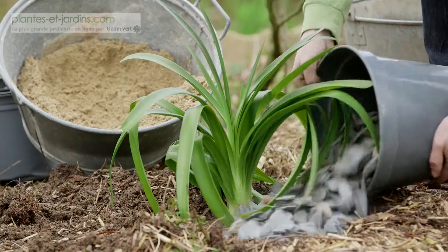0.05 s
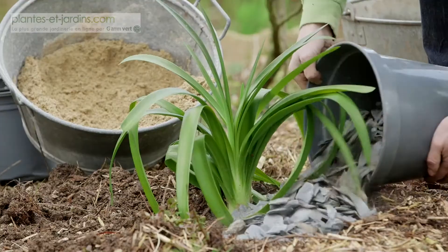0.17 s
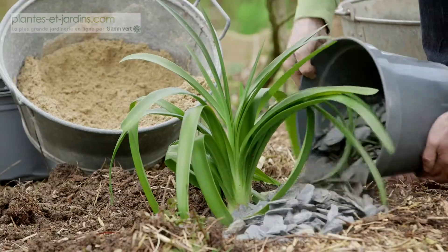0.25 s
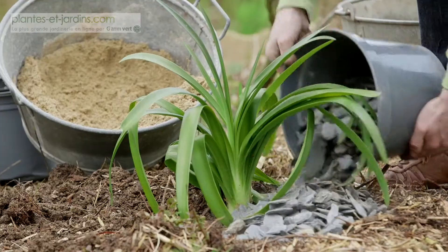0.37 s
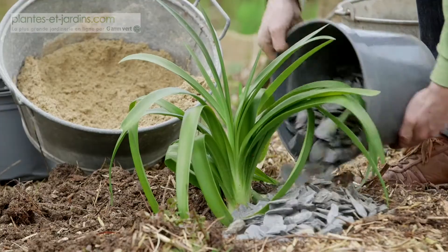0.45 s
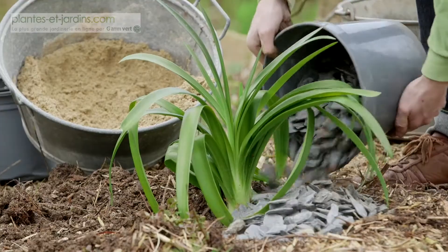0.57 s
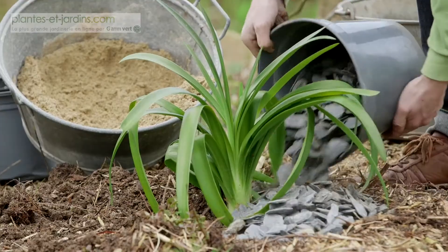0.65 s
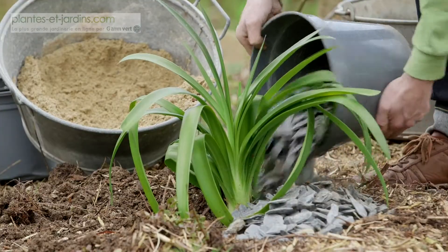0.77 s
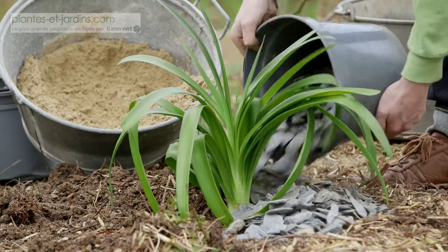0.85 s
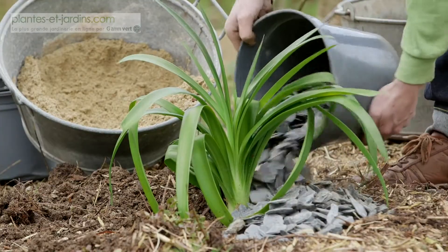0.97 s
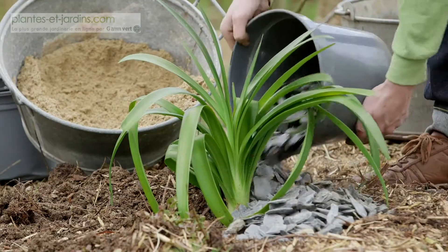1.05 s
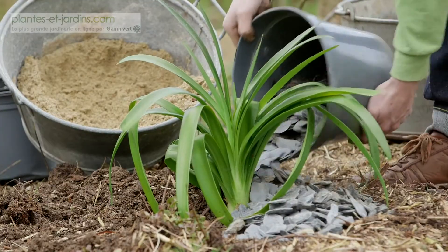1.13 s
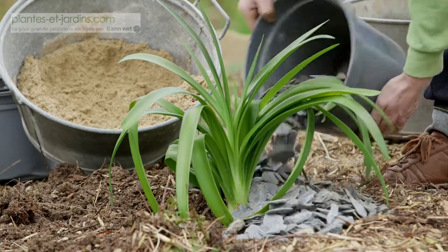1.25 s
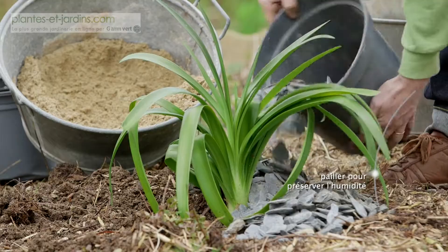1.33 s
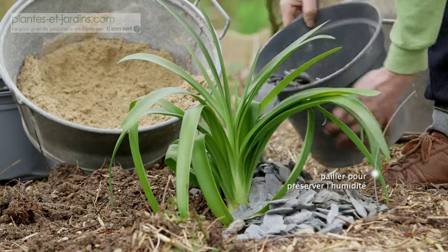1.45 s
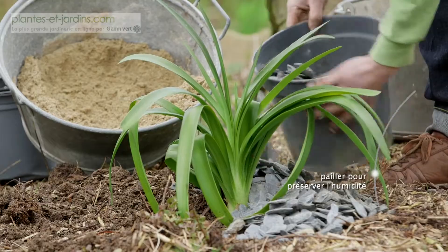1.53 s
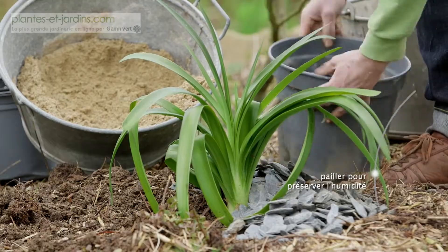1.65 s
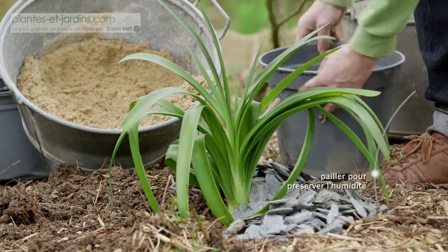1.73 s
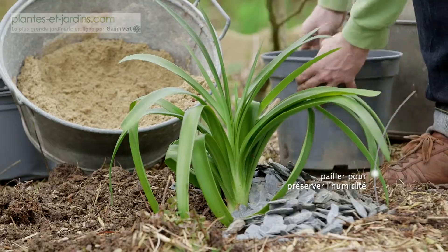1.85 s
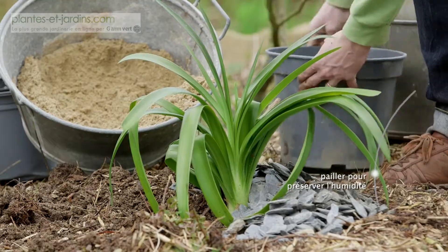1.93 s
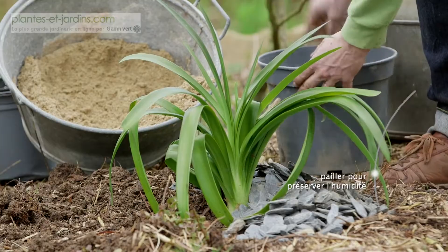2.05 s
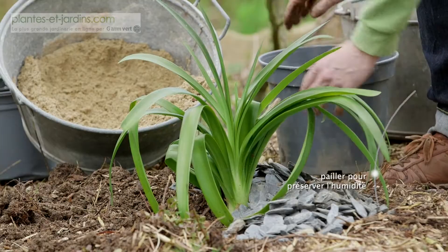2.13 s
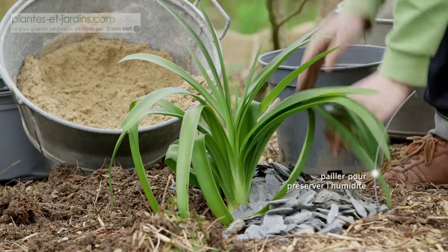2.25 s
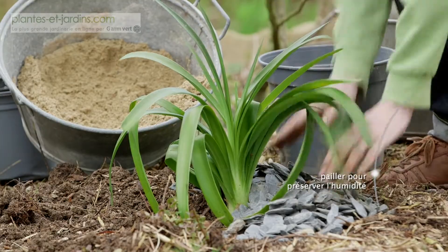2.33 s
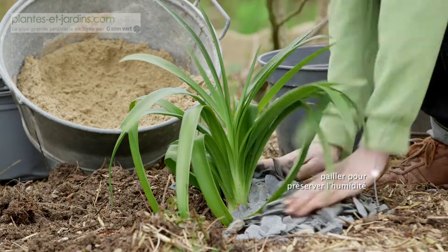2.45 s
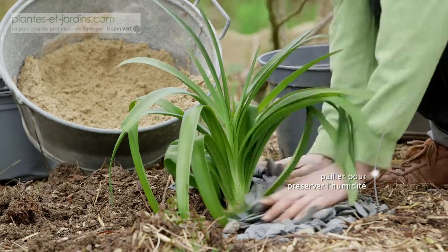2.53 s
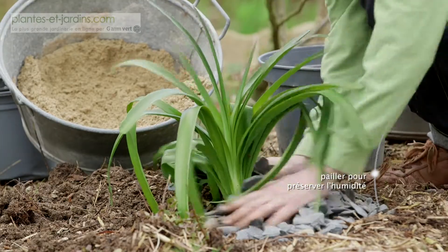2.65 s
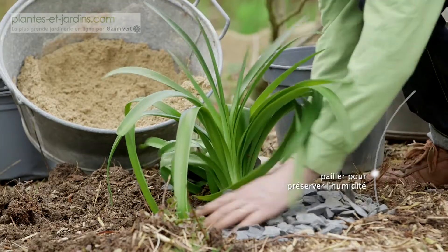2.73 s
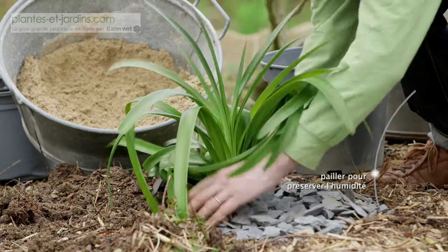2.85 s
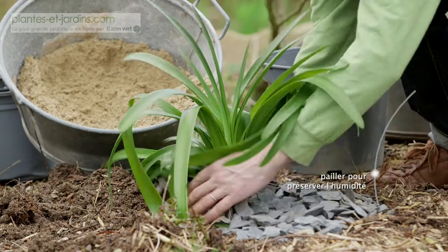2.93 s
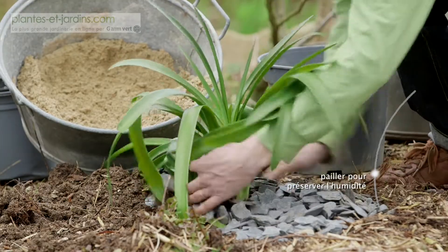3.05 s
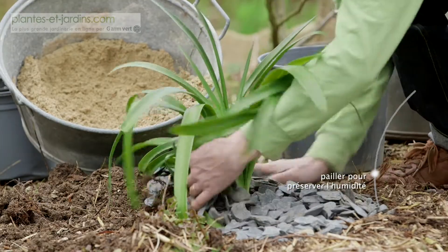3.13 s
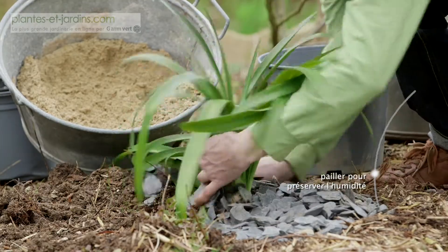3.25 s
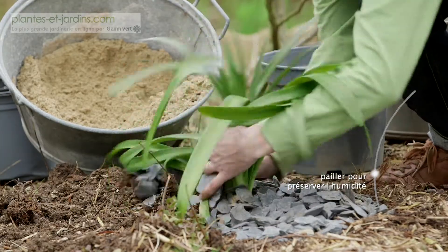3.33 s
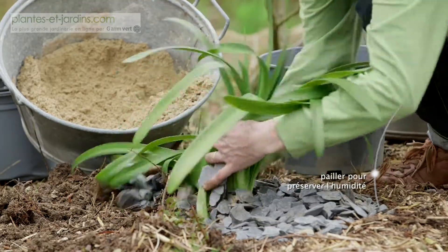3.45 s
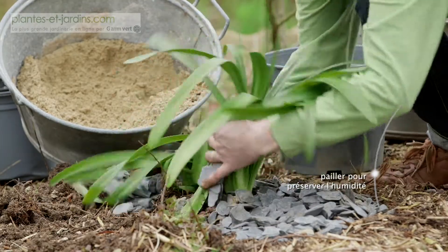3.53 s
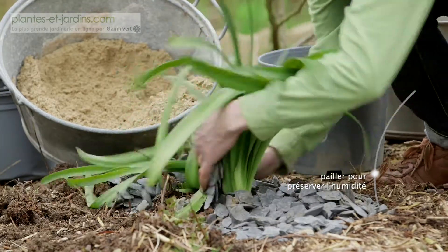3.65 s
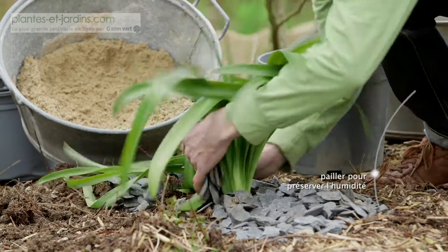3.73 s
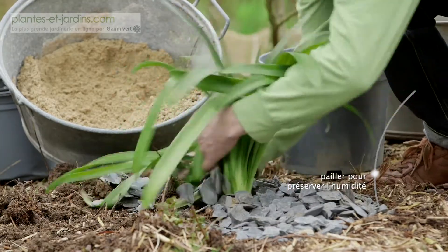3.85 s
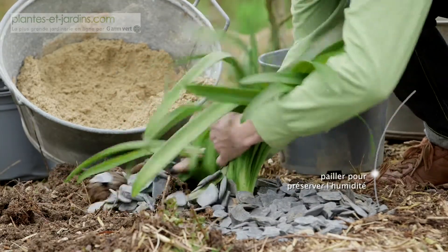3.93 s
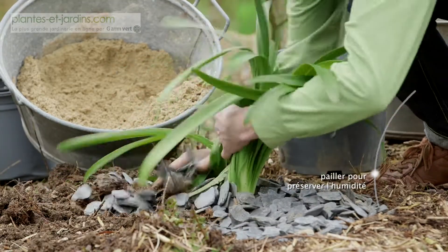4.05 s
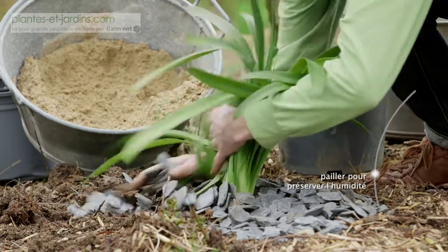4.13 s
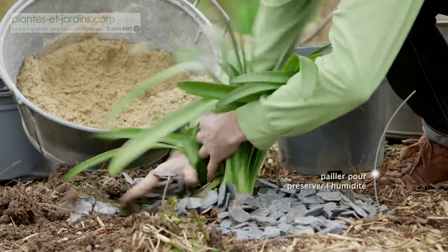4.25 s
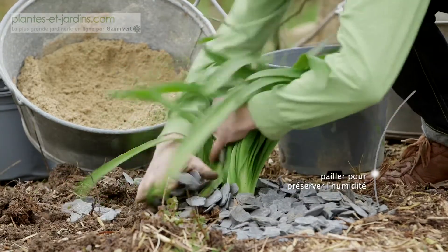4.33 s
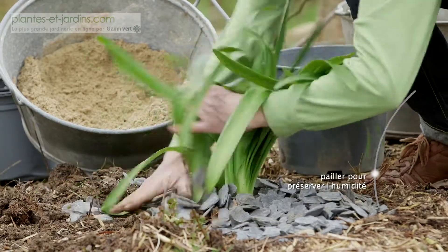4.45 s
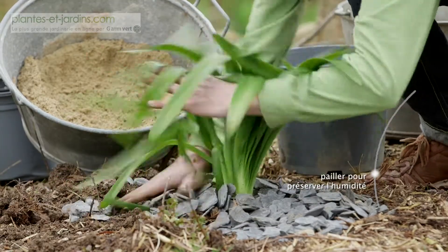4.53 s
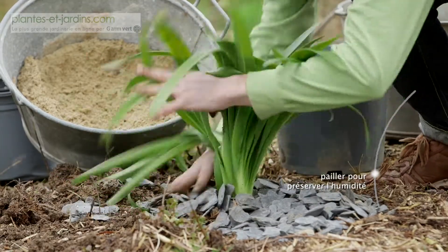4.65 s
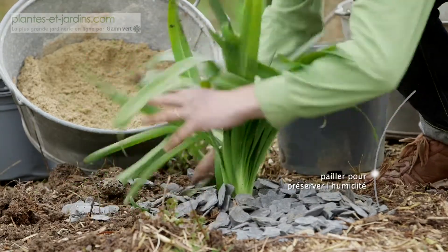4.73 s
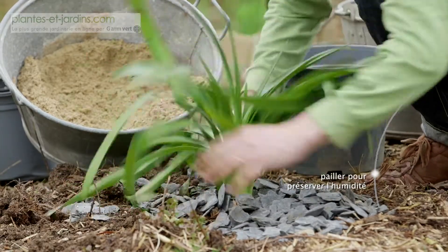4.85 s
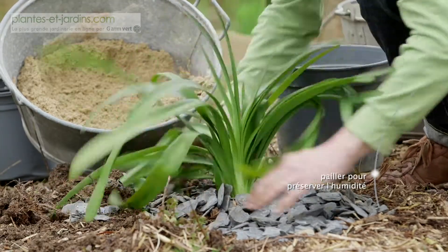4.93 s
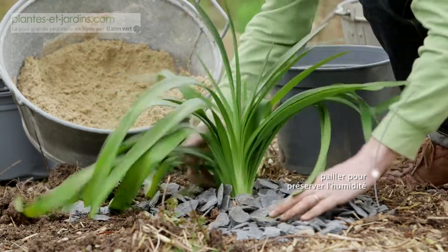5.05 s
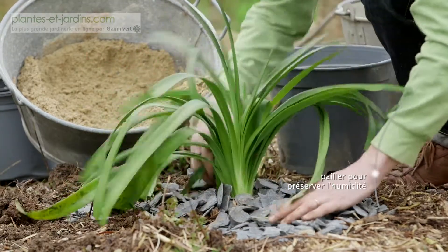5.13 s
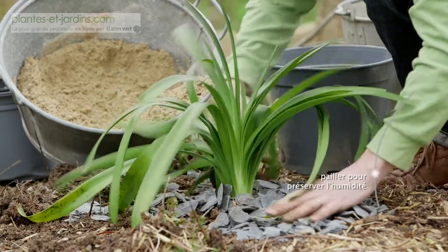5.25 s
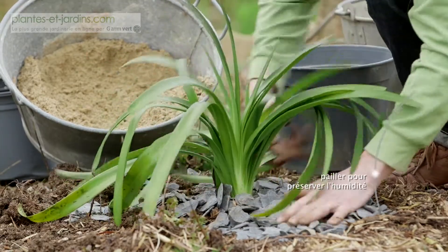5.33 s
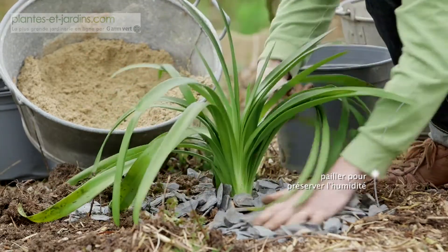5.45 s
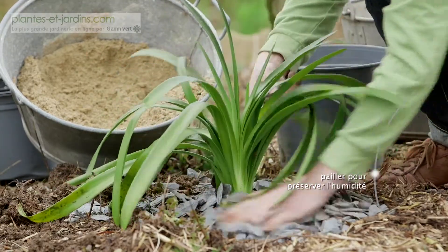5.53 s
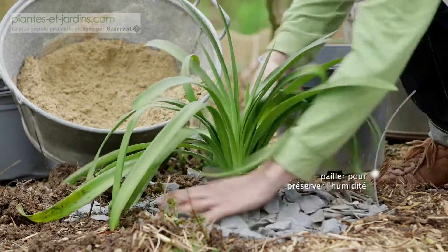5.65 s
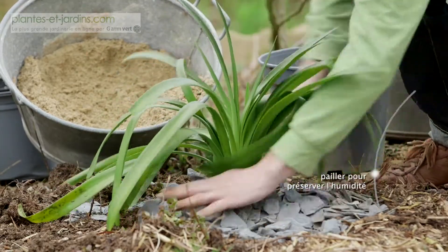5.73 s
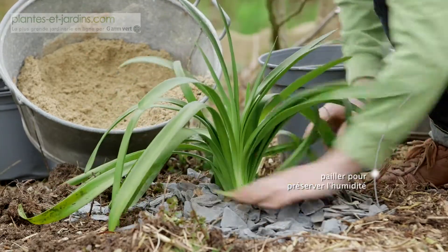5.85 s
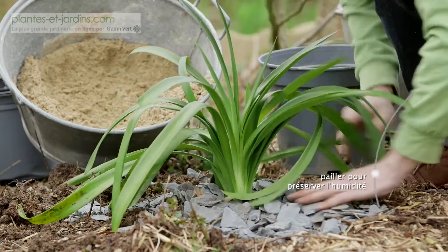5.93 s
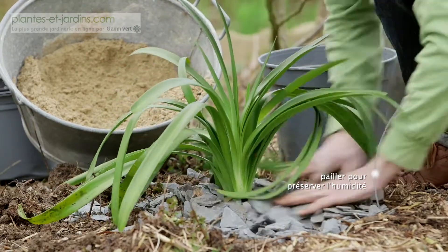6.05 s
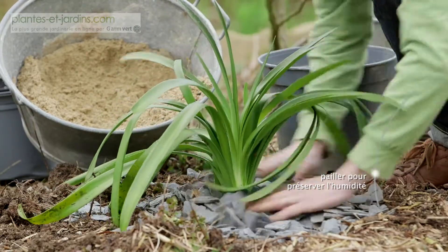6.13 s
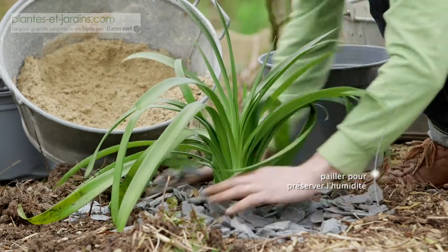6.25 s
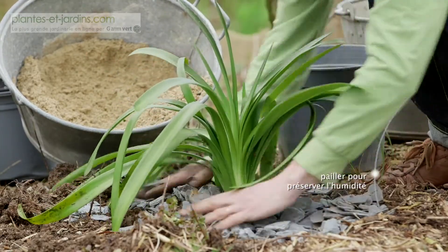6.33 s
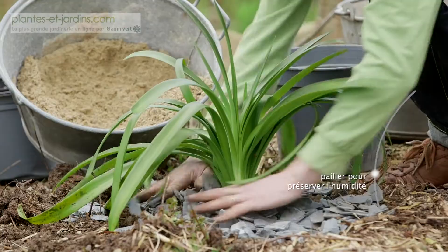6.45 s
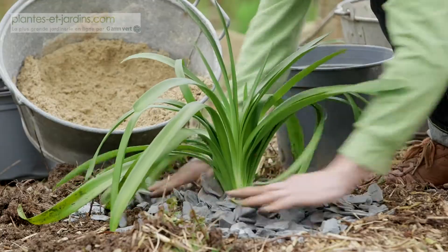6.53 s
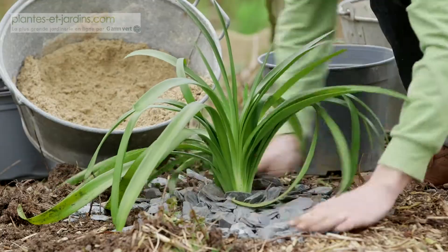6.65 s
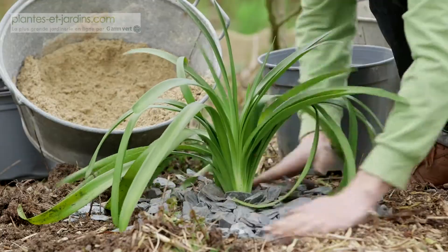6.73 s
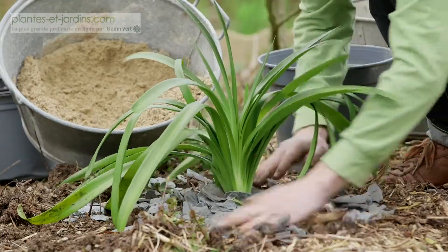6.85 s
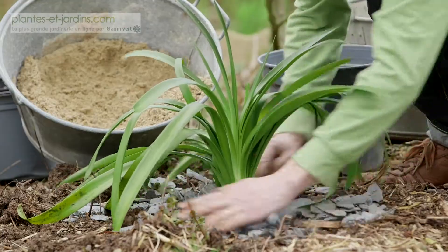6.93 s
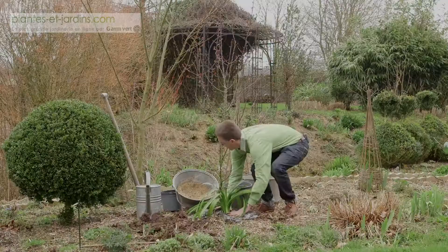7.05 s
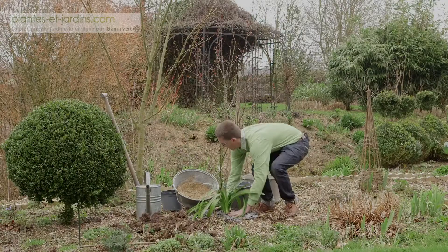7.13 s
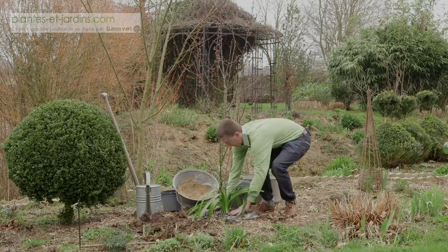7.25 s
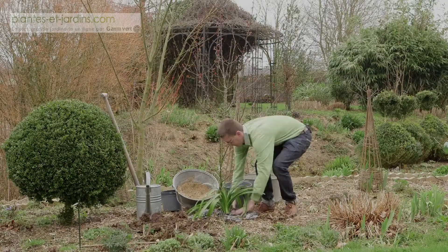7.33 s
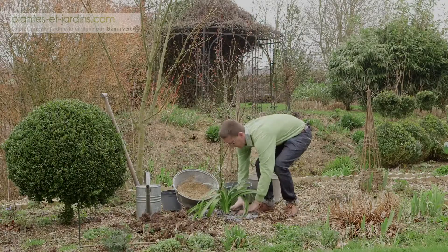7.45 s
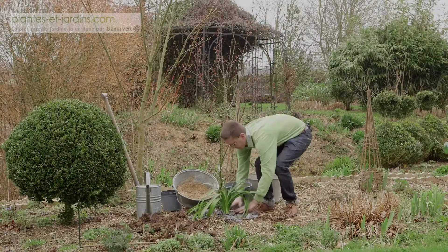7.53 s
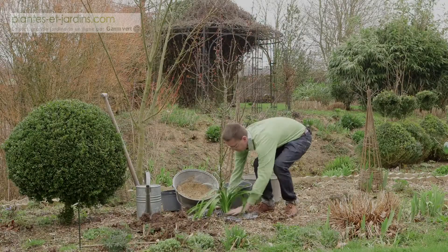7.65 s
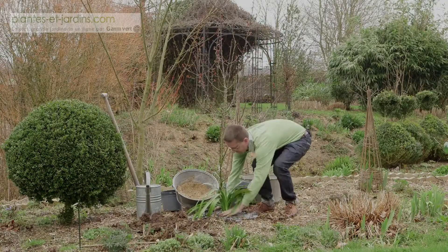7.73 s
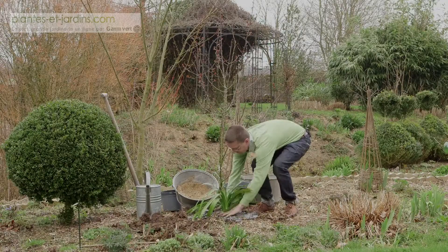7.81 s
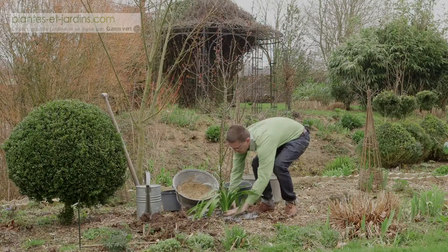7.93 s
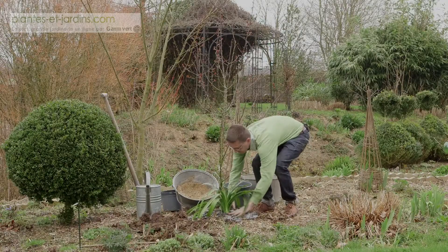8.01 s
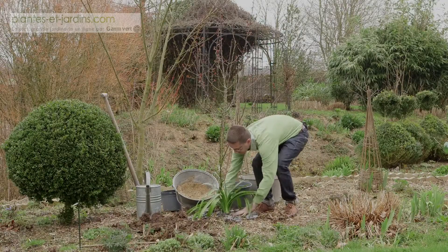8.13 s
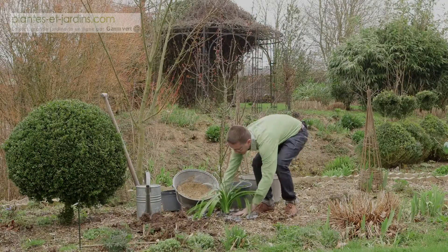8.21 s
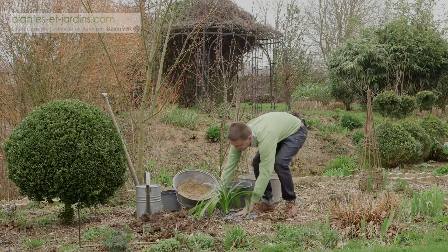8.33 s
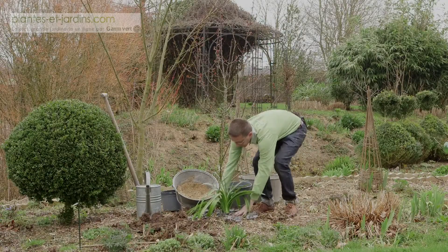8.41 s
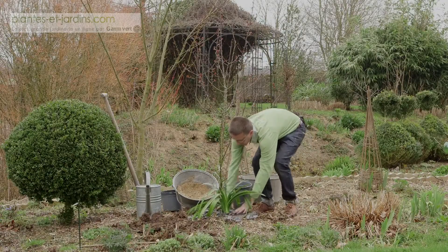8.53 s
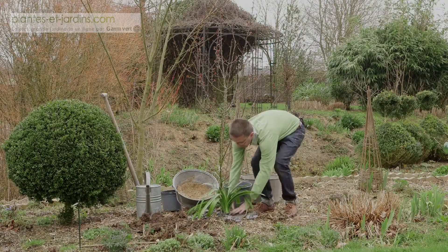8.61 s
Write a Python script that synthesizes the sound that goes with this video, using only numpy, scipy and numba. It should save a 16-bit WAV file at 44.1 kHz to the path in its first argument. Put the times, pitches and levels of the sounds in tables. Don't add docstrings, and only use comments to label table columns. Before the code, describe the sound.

Already in full flow at 0 s, slate chips pour from a plastic bucket onto soil, a loud, dense, bright clatter that quickly thins. Until about 1.5 s smaller surges follow, with hollow knocks and drumming from the bucket wall and chips clicking onto the heap. From 1.6 to 1.95 s comes the heaviest burst, rapid hard plastic knocks and rattling stone, then it drops away by 2.3 s. From 2.4 s hands rake the chips: crisp clinks, scrapes and grinding, strongest until 3.3 s, then sparser and softer to 5.4 s. Palms then pat and sweep, with a brighter gritty swish around 6.1 to 6.2 s, sharp clinks near 6.9 and 7.5 s, and small low bumps around 7.1 to 7.3 s. Light ticks fade towards 8.6 s. Close, dry, outdoors, with very faint low air beneath.

```python
import sys
import numpy as np
from scipy import signal
from scipy.io import wavfile
from scipy.ndimage import uniform_filter1d
from numba import njit

SR = 44100
rng = np.random.default_rng(int(sys.argv[2]) if len(sys.argv) > 2 else 0)


def field_ratio(decibels):
    return 10 ** (np.asarray(decibels, dtype=float) / 20)


def to_wav(sig):
    pcm = np.clip(np.atleast_2d(sig), -1, 1) * 32767
    pcm = np.round(pcm).astype(np.int16)
    wavfile.write(sys.argv[1], SR, pcm.T)


N = 382523
T = np.arange(N) / SR
PATCH_HZ = np.interp(T, np.arange(0, 9, .08), np.cumsum(rng.normal(0, 1500, 113)))

# crest in seconds, rise in seconds, fall in seconds, clatter in dB, bucket boom in dB.
SURGES = [(.045, 0.99, 0.5, -23, -24), (.135, 0.32, 0.22, -49, -26), (.274, 0.16, 0.079, -35, -25.5),
          (.354, 0.069, 0.044, -34, -24.5), (0.454, 0.026, 0.1, -34, -33), (0.642, 0.21, 0.42, -33.5, -20),
          (.8, 0.14, 0.37, -34, -28.5), (.9, 0.17, 0.26, -28, -28.5), (.978, 0.28, 0.11, -29, -26.5),
          (1.177, 0.25, 0.17, -28, -22.5), (1.292, 0.22, 0.21, -33.5, -26), (1.4, 0.4, 0.34, -31, -36),
          (1.482, 0.081, 0.1, -27, -37), (1.627, 0.058, 0.24, -30, -22.5), (1.811, 0.13, 0.2, -21.5, -18.5),
          (1.887, 0.32, 0.15, -19.5, -19.5), (1.99, 0.12, 0.34, -33.5, -35.5)]
# start in seconds, peak in dB, stone pitch in Hz, dull part relative in dB.
RAKED = [(2.4346, -13, 6270, -9), (2.4517, -12.5, 2800, -5.5), (2.4878, -12, 9900, -29),
         (2.7884, -19, 9000, -11), (2.869, -16.5, 2600, 0), (2.9227, -16, 9500, -20.5),
         (2.9398, -18.5, 10200, -17), (2.947, -15.5, 3120, -15), (3.012, -29, 7950, -13),
         (3.064, -22.5, 9900, -26), (3.1279, -10.5, 8400, -13), (3.1856, -13, 8600, -26),
         (3.546, -21, 9700, -7.5), (3.69, -17, 8800, -22), (3.806, -17.5, 9800, -10),
         (3.839, -22, 10500, -20), (3.885, -21.5, 9900, -24), (4.1132, -22.5, 8600, -9),
         (4.4612, -20, 2740, 11), (4.472, -19, 9800, -20), (4.485, -17.5, 10200, -19),
         (4.5008, -21, 10300, 2), (4.525, -15.5, 10700, -16), (4.93, -25, 5400, -1),
         (4.966, -25.5, 3900, -4), (5.058, -21.5, 9550, -7), (5.1, -26, 4340, -15), (5.169, -29.5, 2800, 2),
         (5.2173, -22, 4700, 2), (5.304, -20, 10900, 2), (5.332, -24, 4580, 6)]
# start in seconds, peak in dB, stone pitch in Hz, dull part relative in dB.
PATTED = [(5.4858, -19.5, 5750, -14), (5.588, -22.5, 2090, 3), (5.7171, -19, 11500, -6),
          (5.8353, -30, 2800, 16), (5.8647, -27.5, 7040, -1.5), (5.991, -26.5, 7500, -6),
          (6.302, -16, 13000, 1), (6.3433, -16.5, 8750, 1), (6.4786, -18.5, 9900, -4.5),
          (6.657, -22, 9500, -4), (6.712, -22, 6200, -22), (6.773, -20, 11500, 1),
          (6.9372, -10.5, 11800, -13), (6.985, -20.5, 12300, -1), (7.1186, -24, 3250, 1),
          (7.24, -21, 12100, 2), (7.2556, -24, 8650, -7), (7.366, -26.5, 2750, -12),
          (7.402, -18, 11100, -27), (7.451, -17.5, 10600, -10), (7.5059, -13.5, 10470, -0.5),
          (7.522, -16.5, 7950, -17), (7.6, -25.5, 8750, -14), (7.6984, -35, 4120, -16),
          (7.73, -26.5, 4800, -10), (8.1499, -21, 9300, -8), (8.5265, -28, 10400, -7),
          (8.576, -26.5, 6350, -12), (8.596, -24, 9900, -16), (8.6367, -31.5, 7700, -7)]
# start in seconds, peak in dB.
NUDGED = [(2.963, -23), (3.0305, -20.5), (3.5957, -22.5), (3.7135, -23), (3.7341, -20.5), (3.7835, -28),
          (3.85, -26), (4.019, -25.5), (4.138, -25), (4.164, -28), (4.318, -37), (4.6267, -28.5),
          (4.9107, -28), (4.9537, -28), (5.074, -23), (5.1818, -25), (5.2954, -26.5), (5.362, -27.5),
          (5.373, -26), (5.633, -18), (6.3732, -18.5), (6.581, -21.5), (6.8863, -13.5), (6.9015, -15.5),
          (7.083, -23), (7.136, -26), (7.7668, -25.5), (7.802, -43), (7.999, -24.5), (8.217, -24)]


def level(x, db):
    return x * field_ratio(db) / np.sqrt(np.mean(x ** 2))


def high(x, hz):
    return signal.sosfilt(signal.butter(4, hz, "high", fs=SR, output="sos"), x)


def colour_db(table, hz):
    table_hz, table_db = np.transpose(table)
    return np.interp(np.log(hz), np.log(table_hz), table_db)


@njit
def ring(start, hz, t60, size):
    out = np.zeros(N)
    for k in range(len(start)):
        turn = np.exp((2j * np.pi * hz[k] - np.log(1000) / t60[k]) / SR)
        z = size[k] + 0j
        i0 = int(start[k] * SR)
        for i in range(i0, min(N, i0 + int(t60[k] * SR))):
            out[i] += z.imag
            z *= turn
    return out


@njit
def svf(x, hz, width):
    y, band, low = np.empty(len(x)), 0., 0.
    g, k = np.tan(np.pi * hz / SR), width / hz
    for i in range(len(x)):
        v = (band + g * (x[i] - low)) / (1 + g * (g + k))
        band, low, y[i] = 2 * v - band, low + 2 * g * v, k * v
    return y


def clicks(s, db):
    x = np.zeros(N)
    at = np.minimum(s * SR, N - 1).astype(int)
    np.add.at(x, at, field_ratio(db) * rng.choice([-1, 1], len(s)))
    return x


def crowd(count, spread_db):
    u = rng.random((count, 2))
    return u[:, 0] * N / SR, -spread_db * np.log(1.01 - u[:, 1])


def motion(moves, db):
    span_db, roundness = 27.5, 1.066
    power = 0
    for (crest, rise, fall), top_db in zip(np.array(moves)[:, :3], db):
        away = np.maximum((crest - T) / rise, (T - crest) / fall)
        power = power + field_ratio(top_db - span_db * away ** roundness) ** 2
    return np.sqrt(power)


def collide(s, db, lo_hz, hi_hz, t60, smear, count, near_hz=None):
    # frequency in Hz, level in dB per Hz.
    stone_spectrum = [(500, 1), (800, 0), (1400, 2), (3000, -3.5), (4300, 0), (6000, -3.5), (8400, -5),
                      (11800, -5.5), (13200, -16.5), (16000, -34)]
    # time in seconds, middle over top ring in dB.
    chip_size = [(0.0, -2.5), (0.6, -0.5), (1.5, -2.5), (1.8, 4), (2.1, 0.5), (2.4, 0), (3.1, -3),
                 (4.6, -6.5), (5.2, 1), (5.3, -5.5), (5.9, -0.5), (6.15, -4), (6.5, -10), (7.1, 1.5),
                 (7.4, -5.5), (7.7, 0.5), (8.2, -6), (8.5, 1.5)]
    focus_db, far_db = 22, 5.5
    u = rng.random((len(s), count, 5))
    hz = lo_hz + (hi_hz - lo_hz) * u[..., 0]
    life = t60 * np.exp(3.04 * (u[..., 1] - .5))
    big_db = np.interp(s, *np.transpose(chip_size))[:, None] + 0.5
    tilt_db = .5 * big_db * np.tanh((6500 - hz) / 900) * (hz > 2500)
    patch_hz = PATCH_HZ[(s * SR).astype(int) % N][:, None]
    patch_db = 4.2 * np.cos((hz - patch_hz) / 854.0) * (hz > 2500)
    if near_hz is not None:
        patch_db = patch_db - np.minimum(focus_db * np.log2(hz / near_hz[:, None]) ** 2, far_db)
    mode_db = db[:, None] + colour_db(stone_spectrum, hz) + tilt_db + patch_db - 4.25 * u[..., 2]
    size = field_ratio(mode_db) * np.sign(u[..., 3] - .5)
    start = s[:, None] + np.reshape(smear, (-1, 1)) * u[..., 4] ** 1.7
    return ring(start.ravel(), hz.ravel(), life.ravel(), size.ravel())


def bucket(push):
    # frequency in Hz, width in Hz, level in dB.
    wall_modes = [(326, 340, -10), (451, 104, 0), (610, 186, -7.5), (950, 67, 2.5), (1420, 620, -6)]
    upright_s = 1.54
    soft = svf(push, 706.0, 1240.0)
    upright = T > upright_s
    gone = np.clip(T / upright_s, 0, 1)
    states = ((0.97, 1 - gone, 1.),
              (0.993, gone * ~upright, 1.),
              (1.01, upright, 1.97))
    out = 0
    for k, (hz, width_hz, db) in enumerate(wall_modes):
        for tune, share, damp in states:
            gain = (-1) ** k * field_ratio(db) / np.sqrt(damp)
            out = out + gain * svf(soft * np.sqrt(share), tune * hz, damp * width_hz)
    return out


def pour():
    # start in seconds, peak in dB.
    wall_knocks = [(0.052, -17), (0.114, -14), (0.144, -12), (0.181, -14.5), (0.203, -18), (0.364, -13.5),
                   (0.406, -11), (0.553, -13), (0.628, -9), (0.735, -17), (0.762, -11), (0.816, -16),
                   (0.837, -6), (0.928, -19), (0.963, -15), (1.053, -16), (1.122, -15), (1.142, -25),
                   (1.165, -26), (1.333, -15), (1.578, -8), (1.605, -25), (1.6365, -4.5), (1.683, -3.5),
                   (1.698, -8), (1.723, -7.5), (1.747, -3.5), (1.795, -1.5), (1.816, -11), (1.864, -6),
                   (2.127, -17)]
    boom_db = np.transpose(SURGES)[4]
    drum = level(bucket(clicks(*crowd(count=4000, spread_db=2.5))), -1.73) * motion(SURGES, boom_db)
    s, db = np.transpose(wall_knocks)
    knocks = field_ratio(29.5) * bucket(clicks(s, db) + clicks(s + 0.002244, db - 4.0))
    stone = collide(s, db - 18.0, lo_hz=1500, hi_hz=9000, t60=0.0082, smear=0.005, count=12)
    return high(drum + knocks, 180.0) + stone


def tumble():
    # start in seconds, peak in dB, wall pitch in Hz.
    wall_notes = [(0.073, -16, 1360), (0.079, -8.5, 924), (0.206, -13, 1030), (0.2859, -16, 600),
                  (0.3175, -23, 560), (0.335, -16, 950), (0.35, -19, 1012), (0.4165, -25, 905),
                  (0.4295, -14.5, 1010), (0.4376, -21, 520), (0.4766, -20.5, 644), (0.621, -17, 990),
                  (0.63, -17, 1000), (0.7042, -15, 1580), (0.826, -16, 940), (1.071, -16, 553),
                  (1.1805, -17, 647), (1.2226, -23, 1030), (1.284, -14, 615), (1.3366, -21, 1250),
                  (1.363, -16.5, 1310), (1.437, -16, 1420), (1.476, -19, 1220), (1.493, -15, 1170),
                  (1.5777, -6, 2150), (1.6432, -8, 1252), (1.73, -8, 1020), (1.816, -2, 1400),
                  (1.829, -9, 1630), (1.872, -6, 444), (1.883, 1, 1510), (1.9088, -8.5, 1120),
                  (1.9473, -19, 1310), (1.9861, -24, 950), (2.011, -25, 1030), (2.0367, -34, 1070),
                  (2.074, -26, 1010), (2.179, -29, 1370)]
    s, db, hz = np.transpose(wall_notes)
    t60_s = 0.039 * (900 / hz) ** 0.62
    first = ring(s, hz, t60_s, field_ratio(db - 8.0))
    second = ring(s + 0.00313, 1.017 * hz, t60_s, field_ratio(db - 18.5))
    rattle = collide(s, db - 14.0, lo_hz=790, hi_hz=3580, t60=0.01, smear=0.0062, count=8)
    return first + second + rattle


def stir():
    # crest in seconds, rise in seconds, fall in seconds,
    # clatter in dB, grinding relative in dB.
    rake_moves = [(2.454, 0.028, 1.46, -34.5, -1), (2.7, 0.27, 0.46, -32, -3.5), (2.86, 0.2, 0.24, -38, -3),
                  (3.04, 0.14, 0.22, -60, 1), (3.18, 0.43, 0.2, -39, -8), (3.298, 0.3, 0.053, -30, -4.5),
                  (3.4, 1, 0.4, -42.5, 2.5), (3.6, 0.79, 0.35, -42, -7.5), (3.717, 0.43, 0.061, -38.5, -9),
                  (3.9, 0.41, 0.74, -42, 0.5), (4.16, 0.6, 1.2, -41.5, -1.5), (4.485, 0.13, 0.25, -39, 0),
                  (4.7, 0.19, 0.39, -42, -7), (4.826, 0.13, 0.11, -43, -4), (5.068, 0.5, 0.18, -48, -2),
                  (5.173, 0.14, 0.34, -46, 0), (5.308, 0.092, 0.24, -44.5, -0.5)]
    # crest in seconds, rise in seconds,
    # fall in seconds, clatter in dB, grinding relative in dB.
    palm_moves = [(5.493, 0.11, 0.065, -41.5, 4), (5.585, 0.046, .1, -38, 6), (5.63, 0.31, 0.24, -35, 0.5),
                  (5.74, 0.15, 0.058, -38.5, 0), (6.007, 0.08, 0.16, -40, 1),
                  (6.13, 0.088, 0.2, -27.5, -3.5), (6.175, 0.11, 0.24, -25.5, -11),
                  (6.361, 0.45, 0.78, -38.5, -1), (6.555, 0.012, 0.12, -36, -7.5),
                  (6.695, 0.058, 0.056, -33.5, -2.5), (6.864, 0.33, 0.2, -32.5, -4),
                  (6.935, 0.018, 0.093, -32, -4), (7.037, .05, 0.012, -40, 0.5),
                  (7.149, 0.15, 0.1, -38, 2.5), (7.27, 0.15, 0.25, -49.5, 6.5),
                  (7.42, 0.28, 0.19, -41, -4.5), (7.513, 0.16, 0.084, -27.5, -7),
                  (7.787, 0.14, 0.25, -40, -1.5), (7.987, 0.17, 0.1, -40.5, 2.5),
                  (8.201, 0.35, 0.14, -39.5, -1), (8.36, 0.43, 0.022, -42, -9),
                  (8.496, 0.12, 0.13, -46.5, -2.5), (8.67, 0.043, .1, -50.5, 5)]
    boom_share, rest_db = 0.67, -62.5
    lip, hand = np.transpose(SURGES), np.transpose(rake_moves + palm_moves)
    lip_grind_db = (1 - boom_share) * lip[3] + boom_share * lip[4] - 3
    moves = SURGES + rake_moves + palm_moves
    clattering = motion(moves, np.r_[lip[3], hand[3]])
    grinding = motion(moves, np.r_[lip_grind_db, hand[3] + hand[4]])
    return np.hypot(clattering, field_ratio(rest_db)), np.hypot(grinding, field_ratio(rest_db + 4.5))


def clatter():
    s, db = crowd(count=30000, spread_db=1.5)
    scrape = collide(s, db, lo_hz=2365, hi_hz=16000, t60=0.0013, smear=.001, count=2)
    grind = collide(s, db, lo_hz=600, hi_hz=3310, t60=0.0034, smear=0.001994, count=1)
    s, db = crowd(count=1000, spread_db=3.0)
    own_hz = rng.uniform(3000, 13000, len(s))
    ticks = collide(s, db, lo_hz=2665, hi_hz=15860, t60=0.006, smear=.0014, count=18, near_hz=own_hz)
    clacks = collide(s, db, lo_hz=600, hi_hz=3140, t60=0.0022, smear=0.00205, count=5)
    soil = svf(clicks(*crowd(count=5000, spread_db=3.5)), 164.0, 620.0)
    clattering, grinding = stir()
    drag = np.minimum(clattering / field_ratio(-49), 3.5) ** 0.27
    spread_s, loose_db = 6.25, 1.5
    drag = drag / field_ratio(loose_db * (T > spread_s))
    bright = drag * level(scrape, -4.0) + level(ticks, -4.5) / drag
    dull = high(drag * level(grind, -4.) + level(clacks, -5.5) / drag, 666.0)
    return clattering * bright + grinding * dull + grinding ** 0.38 * level(soil, -36.5)


def chips():
    # start in seconds, peak in dB, stone pitch in Hz, dull part relative in dB.
    heap_drops = [(1.404, -12, 8300, -22), (1.465, -8, 7600, -20), (1.5047, -8.5, 10100, -24),
                  (1.5159, -15, 9900, -14), (1.5303, -15, 8850, -20), (1.579, -16.5, 2330, 9.5),
                  (1.6955, -4.5, 11600, -2), (1.7475, -9, 2350, 3), (2.0244, -17.5, 12500, -3),
                  (2.075, -12, 5400, -32), (2.105, -18, 4780, -13), (2.131, -21.5, 4570, -19),
                  (2.2034, -37, 7400, -18), (2.212, -25.5, 3420, -8), (2.2306, -35.5, 2200, 6)]
    # start in seconds, peak
    # in dB, stone pitch in Hz.
    chip_ticks = [(0.0327, -5, 6000), (0.384, -23, 7320), (0.4393, -25, 9900), (0.5252, -22.5, 5700),
                  (0.6, -23, 3080), (0.6083, -24, 2820), (0.6202, -15, 2690), (0.731, -32, 11500),
                  (0.883, -11, 6100), (0.9104, -14, 2800), (1.021, -14, 11000), (1.0523, -15, 8340),
                  (1.129, -18, 5600), (1.168, -12, 6540), (1.347, -24, 3530), (1.3624, -14.5, 3470),
                  (1.3898, -21, 11300), (1.457, -21, 6610), (1.48, -14, 8400), (1.606, -12, 9050),
                  (1.615, -14, 2700), (1.68, -17.5, 4820), (1.73, -9.5, 2950), (1.959, -11.5, 6300),
                  (2.046, -30, 5710), (2.0622, -19.5, 4970), (2.303, -25.5, 1762), (2.374, -33.5, 1300),
                  (2.5015, -15, 10600), (2.563, -21, 11280), (2.6055, -17.5, 10200),
                  (2.6164, -17.5, 2770), (2.713, -24, 4130), (2.7557, -19.5, 3500), (2.8755, -17, 4380),
                  (2.9065, -18, 9730), (3.0959, -21.5, 10790), (3.1074, -23, 7800), (3.16, -18, 8500),
                  (3.238, -13, 9600), (3.25, -14.5, 7800), (3.3, -19, 4170), (3.4986, -24, 3140),
                  (3.507, -25, 7740), (3.6676, -25, 11520), (3.723, -24.5, 7360), (3.748, -26, 7240),
                  (3.82, -22, 8800), (3.9386, -24, 3940), (4.0198, -26, 7500), (4.0416, -33, 9840),
                  (4.078, -29, 9500), (4.1125, -28, 2530), (4.1608, -21, 10190), (4.1696, -16.5, 10900),
                  (4.2435, -25, 10800),
                  (4.4999, -13, 10200), (4.5395, -28, 9840), (4.572, -26.5, 2680), (4.6016, -35, 9670),
                  (4.626, -26.5, 5470), (4.714, -24, 8030), (4.772, -28, 12200), (5.1334, -38, 7540),
                  (5.172, -22, 2610), (5.206, -19, 2900), (5.2347, -31, 11460), (5.4625, -21, 2520),
                  (5.506, -17.5, 6650), (5.6048, -24, 2840), (5.6687, -18, 7620), (5.732, -26, 6460),
                  (6.02, -24, 9300), (6.111, -19, 7400), (6.2107, -17.5, 5860), (6.3134, -17, 2800),
                  (6.351, -15.5, 9390), (6.4906, -22, 8960), (6.613, -30, 12830), (6.689, -21.5, 7000),
                  (6.706, -20, 7460), (6.7284, -20, 7920), (6.755, -20, 9690), (6.8502, -16.5, 7300),
                  (6.8619, -16.5, 12000), (6.959, -17, 7350), (6.999, -21, 2950), (7.011, -28.5, 9840),
                  (7.0378, -37, 3640), (7.055, -24.5, 8140), (7.23, -35, 4050), (7.265, -26.5, 11330),
                  (7.2852, -26.5, 11500), (7.343, -29, 4780), (7.355, -32, 6100), (7.4272, -22, 6330),
                  (7.449, -15.5, 11300), (7.5851, -28, 6010), (7.6793, -34, 3850), (7.784, -23.5, 10300),
                  (7.8026, -26, 3940), (7.8483, -31, 10500), (8.1, -29, 9800), (8.178, -29, 8510),
                  (8.247, -30, 11110), (8.255, -21.5, 9000), (8.3306, -32, 8720), (8.355, -30, 7100),
                  (8.362, -27.5, 2900), (8.3971, -43, 9500), (8.404, -36.5, 9600), (8.615, -38, 2670)]
    s, db = np.transpose(NUDGED)
    small = np.c_[s, db, rng.uniform(6950, 11800, len(s)), np.full(len(s), -9)]
    s, db, hz = np.transpose(chip_ticks)
    ticks = np.c_[s, db - 2, hz, np.full(len(s), -12.)]
    return np.r_[heap_drops + RAKED + PATTED, small, ticks].T


def clinks():
    s, db, hz, dull_db = chips()
    rattle_s = 0.0028 * field_ratio(0.47 * (db + 14.0))
    snap = ring(s + 0.00024, 0.63 * hz, np.full(len(s), .0006), -field_ratio(db - 3.5))
    note_t60_s = 0.01 * np.exp(0.22 * rng.standard_normal(len(s)))
    note = ring(s + 0.00052, hz, note_t60_s, field_ratio(db - 5.0))
    crack = collide(s, db - 4.5, lo_hz=2500, hi_hz=15750, t60=0.005, smear=rattle_s, count=24, near_hz=hz)
    dull_db = db + np.minimum(dull_db, 1) - 4.0
    dull = collide(s, dull_db, lo_hz=726, hi_hz=2800, t60=0.0024, smear=0.712 * rattle_s, count=9)
    return snap + note + crack + dull


def thuds():
    # start in seconds, peak in dB.
    air_pops = [(0.862, -24), (1.3913, -28), (1.4655, -24), (1.5063, -16.5), (1.606, -18.5), (1.7, -13.5),
                (1.825, -22), (2.1017, -28), (2.4365, -33), (2.45, -27), (2.488, -26.5), (2.9236, -24),
                (2.941, -23.5), (3.129, -34), (3.1875, -28), (3.8051, -25.5), (5.717, -28.5), (6.1126, -30),
                (6.1956, -29), (6.314, -25.5), (6.3522, -24.5), (6.481, -24.5), (6.685, -34), (6.888, -25),
                (6.939, -20), (7.241, -26.5), (7.4036, -19.5), (7.4503, -22), (7.509, -23.5)]
    # start in seconds, peak in dB, pitch in Hz, t60 in seconds.
    soft_bumps = [(2.18, -35, 450, 0.04), (2.58, -29, 600, 0.068), (4.823, -34.5, 970, 0.025),
                  (5.131, -35, 720, 0.029), (5.387, -22, 112, 0.059), (7.112, -13, 114, 0.0072),
                  (7.274, -15, 105, 0.011), (8.5922, -20, 880, 0.018)]
    press_db = -23
    t = np.arange(-200, 800) / SR
    suck = np.exp(-.5 * (t / 0.00016) ** 2)
    late = t - .00045
    onset = 1.58 / (1 + np.exp(-late / 0.00004))
    puff = onset * np.exp(-np.abs(late) / 0.0012) * np.cos(2 * np.pi * 130 * late)
    hits = np.zeros(N)
    s, db = np.transpose(air_pops)
    hits[(s * SR).astype(int)] = field_ratio(db)
    s, db = np.transpose([row[:2] for row in RAKED + PATTED + NUDGED])
    hits[((s + .001) * SR).astype(int)] = field_ratio(db + press_db)
    pops = signal.fftconvolve(hits, puff - suck)[200:N + 200]
    s, db, hz, t60 = np.transpose(soft_bumps)
    return pops + svf(ring(s, hz, t60, field_ratio(db)), 560.0, 2500.)


def garden():
    # frequency in Hz, level in dB per Hz.
    air_spectrum = [(15, -48), (25, 22), (416, -3), (545, -19), (677, 19.5), (1520, -7), (1900, -13),
                    (11000, -95), (16000, -46)]
    out, hold = 0, SR // 6
    for hz in 28 * 2 ** np.arange(0, 9.2, .5):
        waver = uniform_filter1d(np.repeat(rng.standard_normal(N // hold + 1), hold), hold)[:N]
        band = svf(rng.standard_normal(N), hz, hz / 3)
        out = out + field_ratio(colour_db(air_spectrum, hz) + 3.5 * waver) * band
    return level(out, -56.5)


def scene():
    stone = clatter() + clinks()
    dip_hz, dip_width_hz, dip_share = 5360, 1450, 0.16
    stone = stone - dip_share * svf(stone, dip_hz, dip_width_hz)
    return (stone + pour() + tumble() + thuds() + garden())[None]


def top_cut(x):
    return signal.sosfilt(signal.butter(12, 16460, fs=SR, output="sos"), x)


def record(dry):
    firm = signal.sosfilt(signal.butter(2, 45, "high", fs=SR, output="sos"), dry)
    rounded = .6 * np.tanh(firm / .6)
    cut = signal.sosfilt(signal.ellip(12, .3, 60, 15800, fs=SR, output="sos"), rounded)
    return top_cut(cut)


dry = scene()
out = record(dry)
to_wav(out)
```